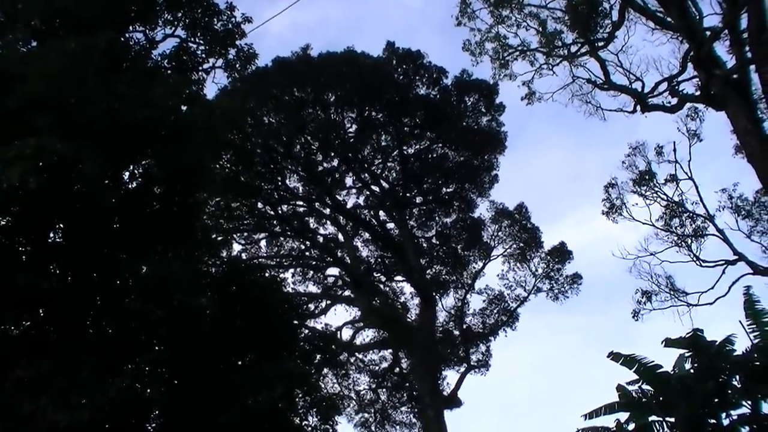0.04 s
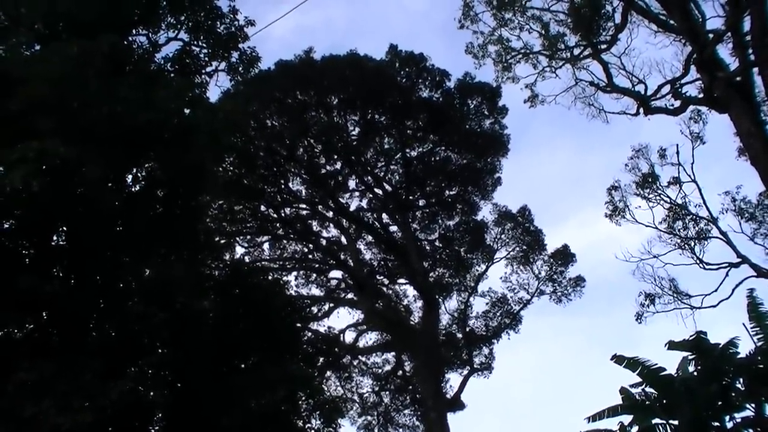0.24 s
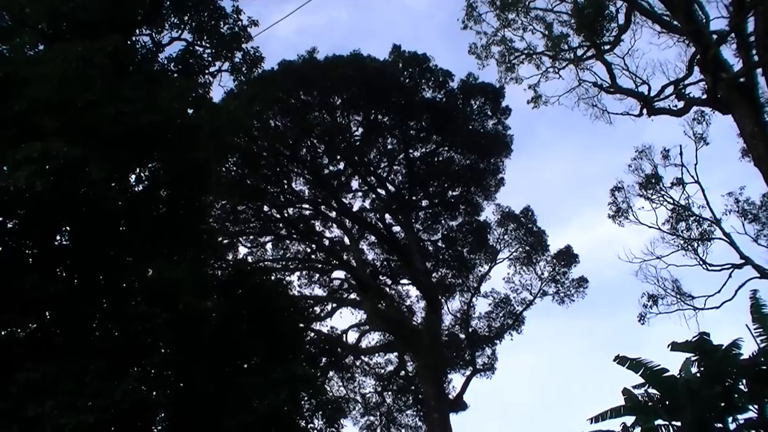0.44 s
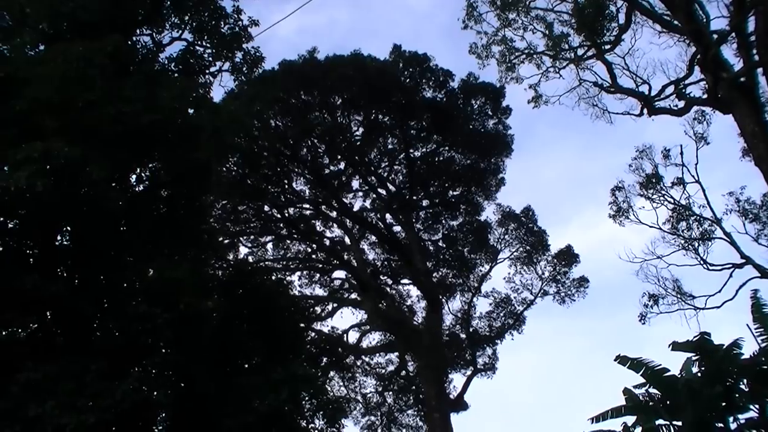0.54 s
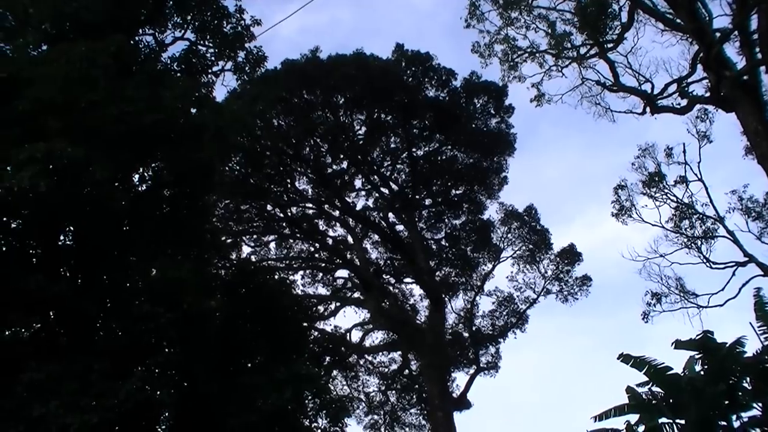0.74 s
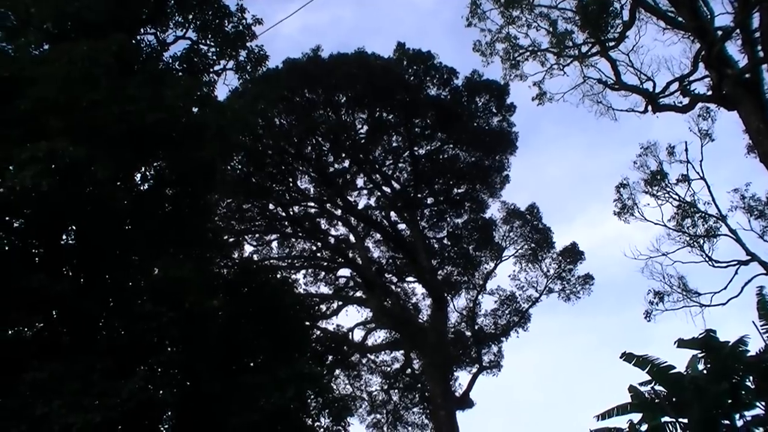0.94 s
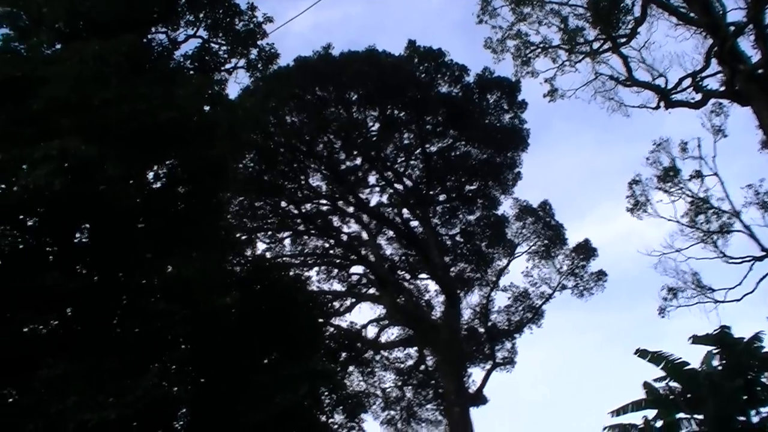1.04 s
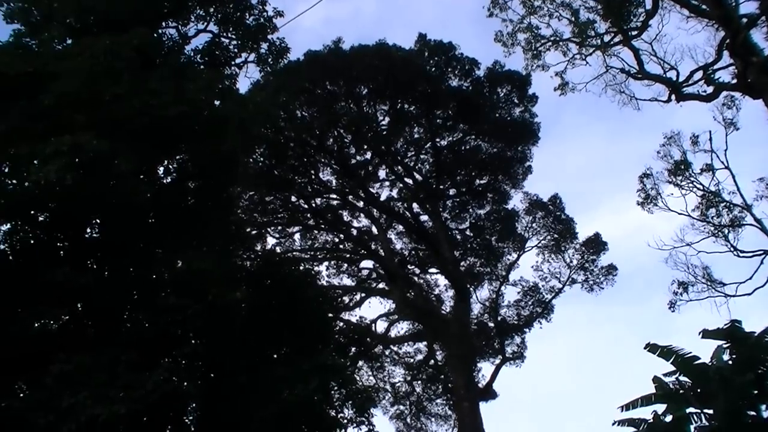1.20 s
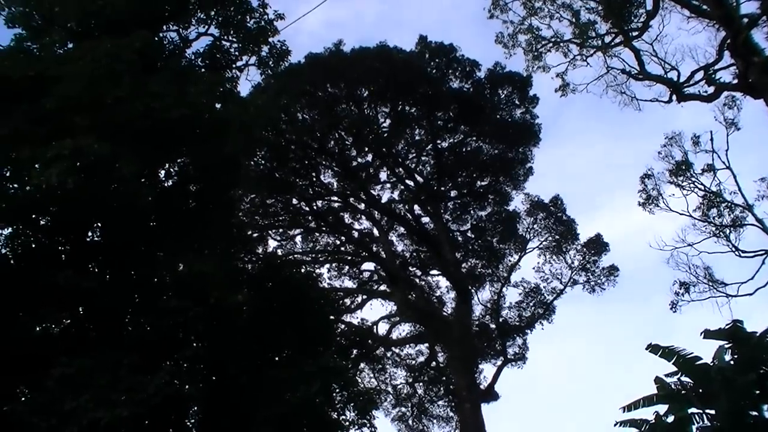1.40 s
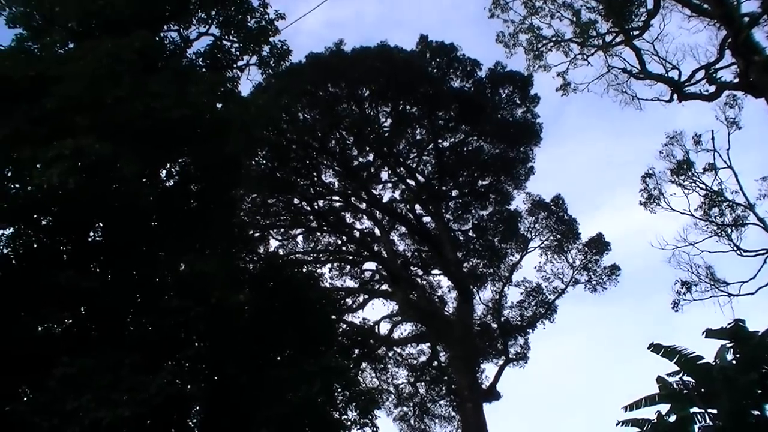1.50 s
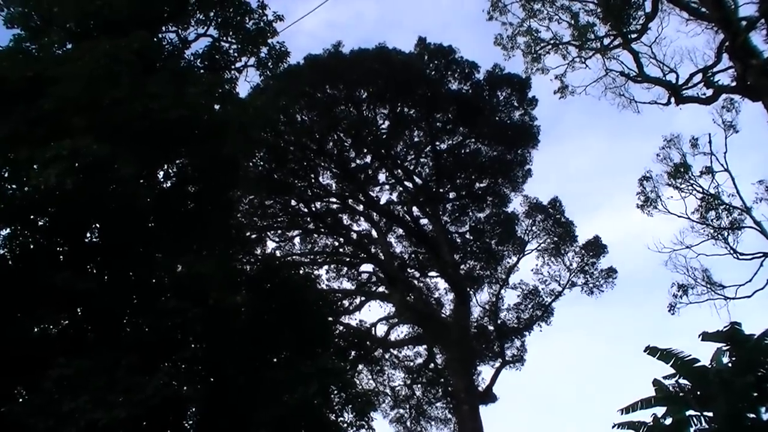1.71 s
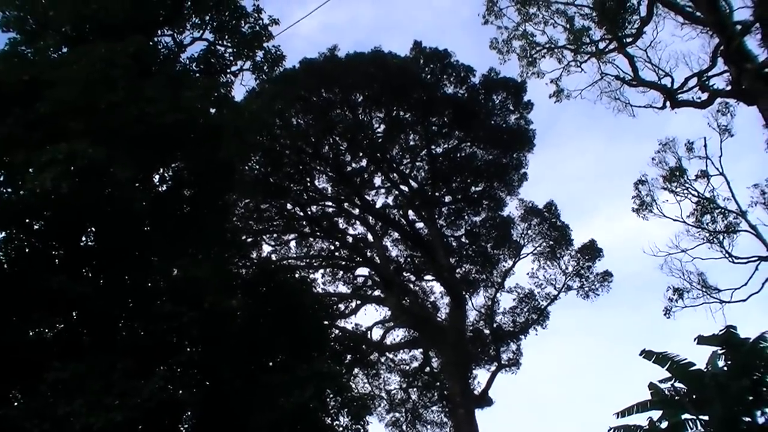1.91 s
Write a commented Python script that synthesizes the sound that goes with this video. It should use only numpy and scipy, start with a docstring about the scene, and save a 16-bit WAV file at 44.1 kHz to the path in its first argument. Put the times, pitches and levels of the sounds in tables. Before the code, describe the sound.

A bird whistles four clear notes in an echoing forest: a softer rising one at 0.1 seconds, a falling one at 0.45, a level one at 0.85, and a louder, higher, fluttering fall from 1.2 to 1.5. Two quick, faint high trills follow at 1.5 and 1.75. Distant small birds chirp throughout over a soft hiss of leaves and insects, with a thin sizzle swelling near 0.9.

```python
"""Forest bird whistling

A bird whistles four clear notes: rising, falling, level, then a higher falling one.
Trunks and foliage throw them back, so they flutter and linger. Small birds chirp and trill
farther off, over a soft hiss of leaves and insects, a treble sizzle, faint rustles and a low hum."""
import sys
import numpy as np
from scipy import signal
from scipy.fft import rfft, irfft
from scipy.io import wavfile
from scipy.ndimage import uniform_filter1d

SR = 44100
rng = np.random.default_rng(int(sys.argv[2]) if len(sys.argv) > 2 else 0)


def store_pcm(level_fs):
    """Save levels as 16-bit WAV."""
    pcm = np.round(np.clip(level_fs, -1, 1) * 32767).astype(np.int16)
    wavfile.write(sys.argv[1], SR, np.atleast_2d(pcm).T)


N = 85995
TIME_S = np.arange(N) / SR
BIN_HZ = np.arange(N // 2 + 1) * SR / N + 1  # offset 1 Hz: no log of zero
SIDE_SIGN = np.array([[1], [-1]])  # left, right
TOP_HZ = 15700


def undb(db):
    """Decibels to gain."""
    return 10 ** (np.asarray(db) / 20)


def unit(x):
    """Scale to rms 1."""
    return x / np.sqrt(np.mean(x ** 2))


def walk(rate_hz):
    """Smooth random drift, rms 1."""
    span = max(int(SR / rate_hz), 2)
    return unit(uniform_filter1d(uniform_filter1d(rng.standard_normal(N), span), span))


def bin_gain(points):
    """Gain per bin from (f/Hz, level/dB) points, on a log-frequency axis."""
    hz, db = np.array(points).T
    return undb(np.interp(np.log(BIN_HZ), np.log(hz), db))


def noise(gain):
    """Noise shaped by a gain per bin, rms about 1."""
    return irfft(rfft(rng.standard_normal(N)) * unit(gain), N)


def band_noise(centre_hz, sigma_oct):
    """Noise in a bell-shaped band."""
    return noise(np.exp(-.5 * (np.log2(BIN_HZ / centre_hz) / sigma_oct) ** 2))


def slur(start_s, length_s, from_hz, to_hz, db):
    """Short linear glide that swells and fades."""
    age = np.clip(TIME_S - start_s, 0, length_s)
    phase = 2 * np.pi * age * (from_hz + (to_hz - from_hz) * age / (2 * length_s))
    return np.sqrt(2) * undb(db) * np.sin(np.pi * age / length_s) * np.sin(phase)


def chirps(flicker_db=3.5, flicker_hz=81):
    """Far birds: slurred tones, mostly falling, flickering in level."""
    # chirps: t/s, length/s, start f/Hz, end f/Hz, level/dB
    calls = [(0.0, 0.021, 5010, 4290, -46), (0.0, 0.07, 5300, 5200, -56), (0.265, 0.056, 2740, 2640, -60),
             (0.359, 0.058, 3510, 2925, -51.5), (.53, 0.16, 5550, 5100, -62.5),
             (.57, .08, 2780, 2550, -60.5), (.62, 0.11, 4320, 3840, -56), (.64, 0.22, 4900, 4800, -59),
             (0.667, .07, 3150, 2820, -55.5), (.74, .12, 3882, 3633, -54), (.792, 0.0216, 5100, 5900, -50),
             (.835, .04, 7150, 5850, -57), (.868, .026, 6190, 5130, -50.5), (0.901, .035, 5980, 5500, -54),
             (.925, 0.059, 2510, 2487, -54.5), (.92, 0.14, 2970, 2920, -65),
             (0.992, 0.037, 3240, 2726, -49.5), (1.056, 0.086, 2617, 2570, -56.5),
             (1.383, 0.059, 3910, 2945, -57.5), (1.665, 0.091, 2510, 2470, -56.5),
             (1.836, 0.081, 2950, 2620, -51)]
    return sum(slur(*call) for call in calls) * undb(flicker_db * walk(flicker_hz))


def leaves_and_insects(level_db=-51, swell_db=0.72, low_cut_hz=45):
    """Wide, smooth hiss that swells slightly."""
    # hiss spectrum: f/Hz, relative level/dB
    spectrum = [(30, -16), (70, -8), (160, -6.5), (260, -4), (420, -5.5), (700, -4.5), (1000, -3.5),
                (1300, -5.5), (2600, -4), (5000, -9), (7000, -12), (9600, -14.5), (13200, -31.5),
                (15500, -44)]
    # stereo width: f/Hz, side minus mid/dB
    width = [(60, -2), (125, 4.5), (300, 2.5), (600, 1), (1200, -5), (2500, -7), (5000, -7.5), (8000, -4),
             (13000, 3)]
    colour = bin_gain(spectrum) / np.hypot(1, (low_cut_hz / BIN_HZ) ** 4)
    side = irfft(rfft(noise(colour)) * bin_gain(width), N)
    return (noise(colour) + SIDE_SIGN * side) * undb(level_db + swell_db * walk(15))


def sizzle(centre_hz=5330, sigma_oct=0.38):
    """Band of treble noise that swells and sinks."""
    # envelope: t/s, level/dB
    swell = [(0, -76), (.5, -66), (.7, -58.5), (.86, -49), (1.0, -58.5), (1.15, -64), (1.95, -58.5)]
    mid, side = band_noise(centre_hz, sigma_oct), band_noise(centre_hz, sigma_oct)
    return (mid + .5 * SIDE_SIGN * side) * undb(np.interp(TIME_S, *np.array(swell).T))


def hum():
    """Two low sines, slightly unsteady in level."""
    # hum tones: f/Hz, level/dB
    tones = [(51.5, -67), (90, -80)]
    steady = sum(np.sqrt(2) * undb(db) * np.sin(2 * np.pi * hz * TIME_S) for hz, db in tones)
    return steady * (1 + 0.087 * walk(6))


def whistler(level_db=-.5, edge_s=0.0091, waver_share=0.0021, dull_db=-28, flicker_db=5):
    """Near bird: almost pure gliding notes whose thin overtones fade in."""
    # notes: start f/Hz, end f/Hz, glide easing/(1/s) (positive: fast first), overtone rise/s
    notes = [(1262, 1425, -2.5, 0.18), (1805.5, 1465, 5.0, 0.16), (1481, 1452, .6, 0.079),
             (2072, 1768, 10.5, 0.13)]
    # envelope per note: t/s, level/dB
    envelopes = [
        [(.135, -51), (.185, -52), (.205, -39.5), (.232, -35.5), (.256, -42), (.286, -37), (.32, -44.5),
         (.345, -39.5)],
        [(.447, -40.5), (.505, -30.5), (.527, -45), (.56, -31.5), (.593, -28), (.612, -38), (.655, -29),
         (.679, -40), (.695, -31), (.768, -30.5)],
        [(.84, -48.5), (.865, -35), (.892, -35.5), (.912, -31), (.94, -28), (.956, -35.5), (.992, -28),
         (1.012, -44)],
        [(1.171, -34), (1.194, -29), (1.24, -26.5), (1.284, -24.5), (1.322, -30.5), (1.385, -29), (1.418, -26),
         (1.46, -31), (1.488, -33.5)],
    ]
    # harmonics 2-10 per note: level/dB re fundamental
    overtones = [(-31, -41, -31, -45, -28.5, -42, -41, -52.5, -66),
                 (-39.5, -31.5, -40, -29.5, -27, -44, -43, -43, -64),
                 (-35.5, -45.5, -35, -29.5, -25.5, -34, -43, -57, -48),
                 (-32, -39, -35, -40, -48, -48, -57, -80, -80)]
    waver = 1 + waver_share * walk(96)
    flutter = last_note_flutter()
    flickers_db = [flicker_db * walk(30) for _ in overtones[0]]
    out = np.zeros(N)
    for (from_hz, to_hz, ease, rise_s), harmonics_db, envelope in zip(notes, overtones, envelopes):
        knots_s, knots_db = np.array(envelope).T
        on = (TIME_S > knots_s[0] - edge_s / 2) & (TIME_S < knots_s[-1] + edge_s)
        age, length_s = TIME_S[on] - knots_s[0], knots_s[-1] - knots_s[0]
        glide = np.expm1(-ease * age) / np.expm1(-ease * length_s)
        hz = (from_hz + (to_hz - from_hz) * glide) * waver[on]
        phase = 2 * np.pi * np.cumsum(hz) / SR
        onset_db = dull_db * np.clip(1 - age / rise_s, 0, 1)
        tone = np.sin(phase)
        for k, (harmonic_db, drift_db) in enumerate(zip(harmonics_db, flickers_db), 2):
            tone += (k * hz < TOP_HZ) * undb(harmonic_db + onset_db + drift_db[on]) * np.sin(k * phase)
        to_edge_s = np.minimum(age + edge_s / 2, length_s + edge_s - age)
        fade = np.sin(np.pi / 2 * np.clip(to_edge_s / edge_s, 0, 1)) ** 2
        gain = undb(np.interp(TIME_S[on], knots_s, knots_db) + level_db)
        out[on] += np.sqrt(2) * tone * fade * flutter[on] * gain
    return out


def rustles():
    """Brief, dry puffs of treble, like leaves brushing."""
    # puffs: centre t/s, half-width/s, level/dB
    puffs = [(0.285, 0.0094, -57), (1.276, 0.011, -57), (1.547, 0.0031, -56), (1.589, 0.0082, -52),
             (1.904, 0.034, -62)]
    envelope = sum(undb(db) * np.exp(-((TIME_S - at_s) / half_s) ** 2) for at_s, half_s, db in puffs)
    return band_noise(centre_hz=8150, sigma_oct=0.37) * envelope


def last_note_flutter(centre_s=1.325, sigma_s=0.059, rate_hz=56, peak_depth=0.58, rate_spread=0.36):
    """Gain of an uneven tremolo in the middle of the last whistled note."""
    depth = peak_depth * np.exp(-.5 * ((TIME_S - centre_s) / sigma_s) ** 2)
    hz = rate_hz * (1 + rate_spread * walk(29.8))
    return 1 + depth * np.sin(2 * np.pi * np.cumsum(hz) / SR)


def trills(pips=7, pip_s=0.012, pip_hz=4618, fall_hz=560):
    """Two quick runs of falling pips, no two alike, each trailed by a softer, lower note."""
    # runs: first pip t/s, pip rate/Hz, level/dB
    runs = [(1.471, 53.0, -46), (1.756, 52.2, -45)]
    trail_delay_s, trail_hz, trail_db = 0.0092, 4344, -13
    out = np.zeros(N)
    for first_s, rate_hz, run_db in runs:
        for k, (pitch_scatter, level_scatter) in enumerate(rng.standard_normal((pips, 2))):
            start_s = first_s + k / rate_hz - pip_s / 2
            hz = pip_hz * (1 + .008 * pitch_scatter)
            db = run_db - 1.5 * level_scatter
            out += slur(start_s, pip_s, hz + fall_hz / 2, hz - fall_hz / 2, db)
            out += slur(start_s + trail_delay_s, pip_s, trail_hz, trail_hz, db + trail_db)
    return out


def forest(direct, wet_db, width=0.22):
    """Direct sound, sparse early echoes off trunks and a diffuse tail from the foliage."""
    t60_s, build_s, foliage_db = 1.42, 0.023, -4
    trunks, delay_s, spread_s, trunk_db = 24, .012, .11, -2.5
    envelope = undb(-60 * TIME_S / t60_s) * (1 - np.exp(-TIME_S / build_s))
    tail = rng.standard_normal((2, N)) * envelope
    response = undb(foliage_db) * tail / np.linalg.norm(tail[0])
    draws = rng.random(size=(trunks, 3))
    distance, polarity = draws[:, 0], np.sign(draws[:, 1:].T - .5)
    strength = np.exp(-distance)
    arrival = ((delay_s + spread_s * distance) * SR).astype(int)
    response[:, arrival] += undb(trunk_db) * polarity * strength / np.linalg.norm(strength)
    mid, side = signal.fftconvolve(direct[None], response, axes=1)[:, :N] * undb(wet_db)
    return direct + mid + width * side * SIDE_SIGN


def scene(right_over_left_db=1.6):
    """Birds among the trees over the background, all slightly to the right."""
    far_calls = chirps()
    birds = forest(whistler(), wet_db=-7.5) + forest(trills(), wet_db=-7.5)
    birds += forest(far_calls, wet_db=-3)
    background = leaves_and_insects() + sizzle() + hum() + rustles()
    return (birds + background) * undb(-SIDE_SIGN * right_over_left_db / 2)


def record(dry):
    """Steep low-pass at TOP_HZ."""
    return signal.sosfilt(signal.ellip(10, .2, 80, TOP_HZ, fs=SR, output="sos"), dry)


dry = scene()
out = record(dry)
store_pcm(out)
```